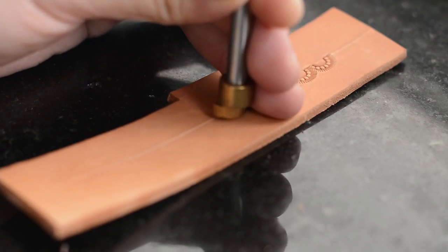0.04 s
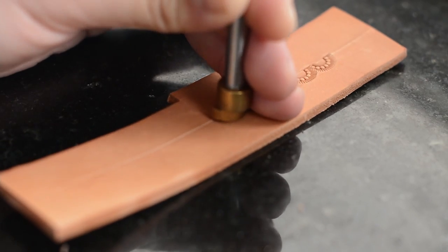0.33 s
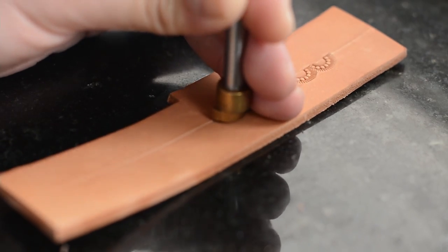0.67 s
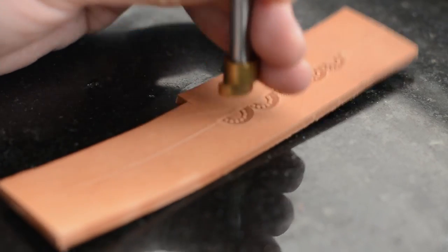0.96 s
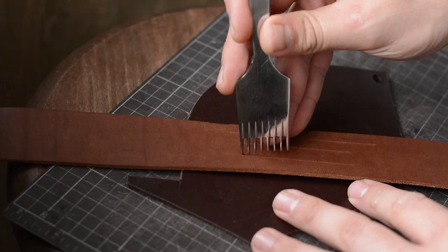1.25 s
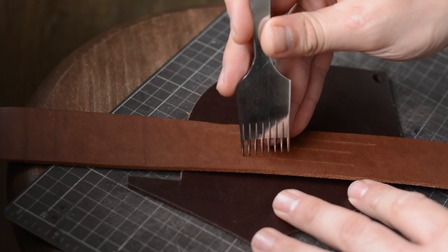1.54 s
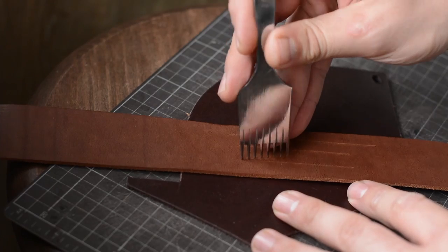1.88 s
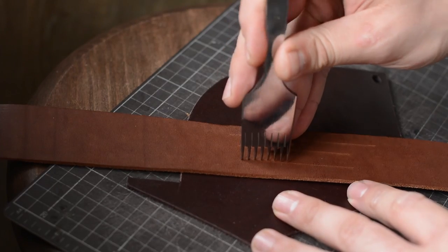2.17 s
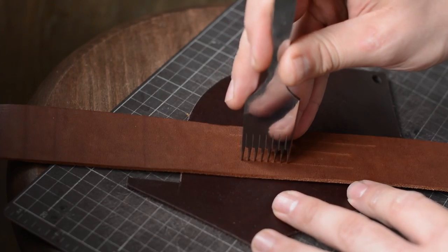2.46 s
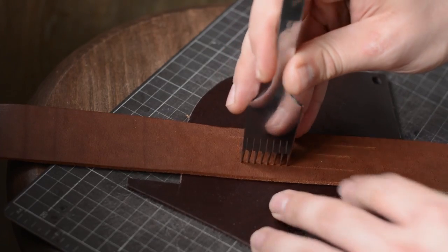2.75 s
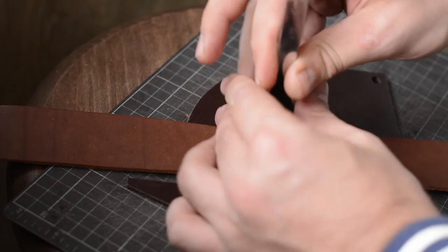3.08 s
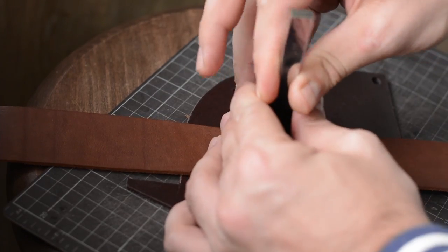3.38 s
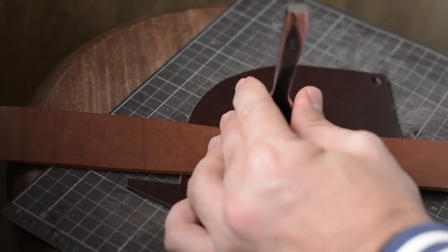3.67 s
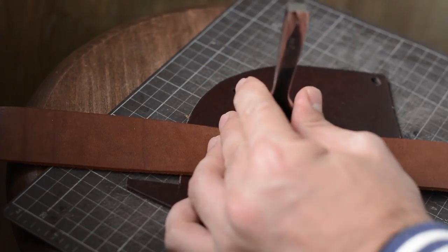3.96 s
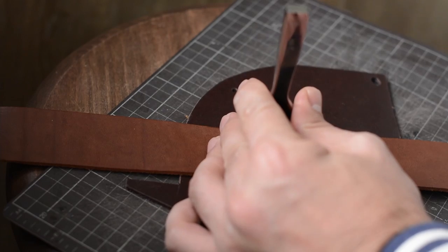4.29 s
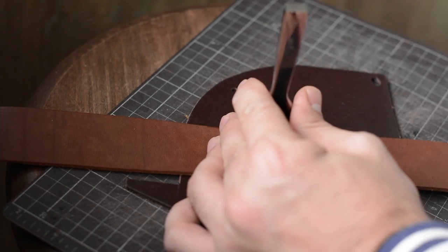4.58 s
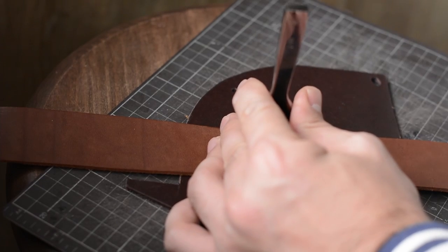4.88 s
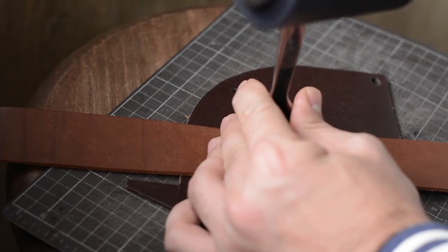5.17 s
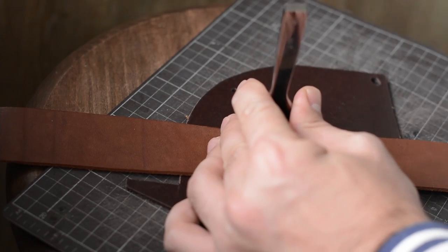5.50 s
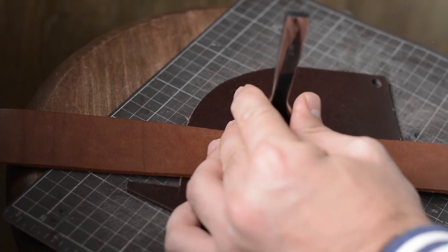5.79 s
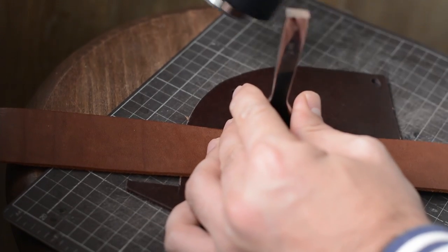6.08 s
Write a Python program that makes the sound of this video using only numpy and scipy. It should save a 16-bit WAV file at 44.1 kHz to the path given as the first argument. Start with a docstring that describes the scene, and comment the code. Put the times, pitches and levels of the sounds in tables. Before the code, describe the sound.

The microphone is close to a workbench in a small, quiet workshop with a faint steady hiss and hum. At about 0.7 seconds a mallet strikes a steel stamp on leather over a stone slab: a loud, sharp crack that briefly overloads, with a low thump from the bench. The steel rings faintly on, and a few tiny clicks sound as the stamp is eased out, until the ringing stops abruptly at 1.3 seconds. Only room tone follows. From about 3.5 to 5 seconds a hand and sleeve swish very softly, with a small bump near 4 seconds as the mallet is picked up. At 5.1 seconds a light tap sets a pricking iron. At 5.5 seconds a full blow lands on it, a loud, short metallic clank with a low bench shudder. A faint scuff follows near 5.9 seconds.

```python
"""Leatherwork in a small, quiet workshop

Close by, a mallet drives a stamp into a strap on a stone slab. The bench rocks; the steel rings on over a low
drone, and all of it breaks off abruptly. An arm rustles as it reaches for the mallet, and a pricking iron on a
wooden block gets a light setting tap and one full blow. The full blows overload the microphone."""
import sys
import numpy as np
from scipy import signal
from scipy.fft import rfft, irfft, next_fast_len
from scipy.io import wavfile

SR = 44100
rng = np.random.default_rng(int(sys.argv[2]) if len(sys.argv) > 2 else 0)


def generate_wav(signal):
    """Clip the signal to [-1, 1] and save it as 16-bit WAV at the path in sys.argv[1]."""
    frames = np.transpose(np.atleast_2d(signal))
    scaled = np.clip(frames, -1, 1) * 32767
    pcm = np.round(scaled).astype(np.int16)
    wavfile.write(sys.argv[1], SR, pcm)


N = 270774
TIME = np.arange(N) / SR

# Mallet on the stamp, lightly on the iron, fully on the iron. Each row: start in seconds, crack gain
# in dB, crack t60 in seconds, snap gain in dB, room gain in dB, left over right in dB.
STAMP_BLOW, SETTING_TAP, IRON_BLOW = [(0.7122, 4, .04, 9.5, -3, -0.36),
                                      (5.0684, -21.5, 0.022, -40, -30, -0.5),
                                      (5.5440, 2.5, 0.031, 4.5, -4.5, 3.5)]
# Stereo image of the reflections and of the room tone. Each row: frequency in Hz, L/R correlation.
ROOM_CORRELATION = [(50, .6), (130, .15), (300, .25), (600, 0.49), (1500, 0.55), (4000, 0.39), (10000, .1)]
AIR_CORRELATION = [(50, 0.97), (150, .45), (600, .22), (3000, .33), (14000, .42)]


def stamping(rebound_s=0.041, rebound_db=-16, linger_db=-42, linger_t60_s=2.1, drone_db=-56, stop_s=1.29):
    """One blow and a slight rebound; things on the bench hum on over a low drone. All ends at stop_s."""
    # Stamp, slab and, last, the damped mallet face. Each row: frequency in Hz, level in dB, t60 in seconds.
    modes = [(105, -25.5, .38), (124, -21.5, 0.66), (148, -33.5, 0.77), (192, -37, 1.2), (217, -10, 0.29),
             (253.4, -8, .18), (336, -10, .18), (400, -12.5, 0.12), (493, -11.5, 0.13), (553, -10, 0.16),
             (570, -48.5, 2.4), (736.5, -6, .17), (988.5, -14, .13), (1190, -47.5, 1.2), (1300, -19.5, .24),
             (2070, -17, .13), (2280, -38.5, 1.6), (2220, -46.5, 1.5), (3360, -19, .1), (3810, -18.5, 0.16),
             (12720, -41, .75), (556, 5.5, 0.019), (2495, 7, .012)]
    # Spectra of the blow, the bench's hum and the drone. Each row: frequency in Hz, relative density in dB.
    clatter = [(90, -7), (170, -6.5), (260, -2), (400, -5), (650, -1), (900, -4.5), (1300, -8), (1700, -11),
               (2400, -10.5), (4100, -10.5), (5200, -21), (9000, -28.5), (15500, -33.5)]
    linger = [(50, -18.5), (120, -2), (190, 1), (250, -13), (600, -14.5), (1300, -18), (2500, -25),
              (6000, -44)]
    drone = [(30, -3.5), (80, -10), (130, 2), (190, 4), (250, -15), (400, -9.5), (800, -19), (3000, -33.5)]
    start_s = STAMP_BLOW[0]
    out = mallet_blow(STAMP_BLOW, modes, clatter)
    add(out, start_s + rebound_s, from_db(rebound_db) * reverb(clatter))
    add(out, start_s, from_db(linger_db) * noise(linger, ROOM_CORRELATION) * decay(linger_t60_s))
    add(out, 0, from_db(drone_db) * noise(drone, AIR_CORRELATION, size=2 * SR))
    gate = np.clip((stop_s - TIME) / 0.0078, 0, 1)
    return out * gate


def pricking(tremble_db=-51):
    """A light tap sets the teeth; a full blow drives them through and leaves the block trembling."""
    # The iron before its teeth sink in; then iron, block and mallet face under the full blow.
    # Each row: frequency in Hz, level in dB, t60 in seconds.
    tap_modes = [(125, -35, 0.37), (404, -43.5, 0.25), (810, -30, 0.14), (1032, -18.5, 0.043),
                 (1178, -15, 0.056), (1475, -34, 0.11), (1880, -40, 0.059), (2910, -44, 0.057),
                 (4620, -41.5, 0.031)]
    iron_modes = [(104, -15, 0.16), (124.5, -17.5, 0.25), (302, -34.5, 0.5), (553, -15, 0.11),
                  (1130, -48, 0.94), (1176.4, -2, 0.088), (1296, -3, 0.17), (1362, -2, 0.089),
                  (1396, -3.5, 0.11), (1584, -5, 0.09), (2074, -24, 0.2), (2188, -16.5, 0.2),
                  (2282, -45, 1), (2346, -17, .14), (2410, -17, 0.13), (3120, -21, 0.15),
                  (3830, -19.5, 0.089), (1416, 5, 0.011), (2497, 11, 0.011)]
    # Noise spectra of the two strokes. Each row: frequency in Hz, relative density in dB.
    tap_clatter = [(60, -12), (110, -5), (200, -11.5), (310, -25.5), (400, -14), (620, -11.5), (850, -2),
                   (1150, -1), (1450, -10), (2300, -19.5), (3000, -32), (9000, -45)]
    iron_clatter = [(90, -11), (230, -15.5), (330, -17), (600, -16), (950, -16), (1270, 1.5), (1500, -2.5),
                    (1850, -13.5), (2400, -6.5), (3200, -16.5), (5000, -23.5), (9500, -38.5), (12700, -35),
                    (15500, -46)]
    out = mallet_blow(SETTING_TAP, tap_modes, tap_clatter)
    out += mallet_blow(IRON_BLOW, iron_modes, iron_clatter)
    add(out, IRON_BLOW[0], from_db(tremble_db) * swing(hz=40, rise_s=0.38, swell=1.5))
    return out


def mallet_blow(stroke, modes, clatter, contact_s=0.00011, snap_t60_s=0.0078):
    """The tool rings, the hard contact cracks with a bright first snap, and the room answers."""
    start_s, crack_db, crack_t60_s, snap_db, room_db, left_db = stroke
    crack = from_db(crack_db) * noise(clatter, correlation=[(100, 1), (10000, 0.43)]) * decay(crack_t60_s)
    bright = bandpass(rng.standard_normal(SR), edges_hz=[2000, 7000], order=1)
    snap = from_db(snap_db) * bright * decay(snap_t60_s)
    direct = (ringing(modes) + crack + snap) * attack(contact_s)
    out = np.zeros((2, N))
    add(out, start_s, direct * pan(left_db) + from_db(room_db) * reverb(clatter))
    return out


def ringing(modes, skew_rad=0.41):
    """Decaying modes of alternating polarity, leading left and right in turn."""
    out = 0
    for k, (hz, db, t60_s) in enumerate(modes):
        sign = (-1) ** k
        phase = 2 * np.pi * hz * TIME[:SR] + sign * skew_rad * np.array([[1], [-1]])
        out += sign * from_db(db) * decay(t60_s) * np.sin(phase)
    return out


def bench(sway_delay_s=0.061, sway_pitch_ratio=0.78):
    """Each jolt bounces the bench top; a slower sway on its legs follows."""
    # Each row: start in seconds, bounce in Hz, bounce level in dB, sway level in dB, sway rise in seconds.
    jolts = [(0.711, 46.5, -14.5, -11, 0.071), (4.069, 54.2, -57, -47.5, 0.065),
             (5.07, 52.7, -34, -39, 0.02), (5.545, 53.2, -21.5, -25.5, 0.047)]
    out = np.zeros((2, N))
    for start_s, hz, bounce_db, sway_db, sway_rise_s in jolts:
        bounce = swing(hz, rise_s=0.031, swell=2.4)
        sway = swing(hz * sway_pitch_ratio, sway_rise_s, swell=1.9)
        add(out, start_s, from_db(bounce_db) * bounce)
        add(out, start_s + sway_delay_s, from_db(sway_db) * sway)
    return out * pan(left_db=5)


def swing(hz, rise_s, swell):
    """A heavy body builds up its swing, then settles."""
    t = TIME[:SR]
    envelope = (t / rise_s * np.exp(1 - t / rise_s)) ** swell
    return -envelope * np.sin(2 * np.pi * hz * t)


def handling():
    """The stamp sounds the same two resonances at each touch; a bump is a dull thud and a bright scuff."""
    # Stamp eased out of the leather. Each row: start in seconds, knock in dB, click in dB.
    stamp_touches = [(0.854, -31, -56), (0.882, -41, -63), (0.948, -54, -39.5), (0.966, -34, -32.5),
                     (0.978, -51, -34.5), (1.149, -42, -51.5), (1.22, -43, -56.5)]
    # Mallet picked up, iron let go. Each row: start in seconds, thud in dB, thud centre in Hz,
    # thud t60 in seconds, scuff in dB, scuff t60 in seconds.
    bumps = [(4.045, -41, 420, 0.076, -38.5, 0.017), (4.154, -47.5, 235, 0.27, -72, .1),
             (5.926, -47.5, 1190, 0.063, -43.5, .12)]
    out = np.zeros((2, N))
    for start_s, knock_db, click_db in stamp_touches:
        knock = from_db(knock_db) * touch(hz=1330, half_width_oct=0.19, t60_s=0.041)
        click = from_db(click_db) * touch(hz=3700, half_width_oct=0.35, t60_s=0.017)
        add(out, start_s, knock + click)
    for start_s, thud_db, thud_hz, thud_t60_s, scuff_db, scuff_t60_s in bumps:
        thud = from_db(thud_db) * touch(hz=thud_hz, half_width_oct=0.45, t60_s=thud_t60_s)
        scuff = from_db(scuff_db) * touch(hz=3500, half_width_oct=1.4, t60_s=scuff_t60_s)
        add(out, start_s, thud + scuff)
    return out


def touch(hz, half_width_oct, t60_s, room_db=-21, room_t60_s=0.22, stereo_width=0.55):
    """A small contact: a noise burst in one broad resonance, with a faint room tail."""
    edges_hz = [hz / 2 ** half_width_oct, hz * 2 ** half_width_oct]
    mid, side = bandpass(rng.standard_normal((2, SR)), edges_hz, order=2)
    burst = mid + stereo_width * side * [[1], [-1]]
    burst /= np.sqrt(np.mean(burst ** 2))
    return burst * np.hypot(decay(t60_s), from_db(room_db) * decay(room_t60_s))


def arm(taper=1.18):
    """The bright swish and the dull sleeve rustle of the reaching arm follow the arm's speed."""
    # Reaching for the mallet and raising it.
    # Each row: fastest moment in seconds, nominal half-length in seconds, swish in dB, sleeve in dB.
    moves = [(3.561, .055, -61, -62), (3.898, 0.15, -54, -60.5), (4.082, 0.049, -54, -70),
             (4.421, .06, -52, -74), (4.78, 0.22, -69, -60)]
    # Spectra of the bright swish and the dull sleeve rustle. Each row: frequency in Hz, relative density in dB.
    swish_spectrum = [(150, -7), (400, -5.5), (650, -12.5), (1000, -3.5), (1700, -8.5), (2500, -5.5),
                      (5000, -11), (8000, -10), (15500, -16.5)]
    sleeve_spectrum = [(50, -12.5), (120, -0.5), (320, -3), (800, -7), (1500, -15.5), (5000, -30)]
    swish_gain, sleeve_gain = 0, 0
    for peak_s, half_s, swish_db, sleeve_db in moves:
        speed = 1 / np.cosh(np.clip(taper * (TIME - peak_s) / half_s, -20, 20))
        swish_gain = np.hypot(swish_gain, from_db(swish_db) * speed)
        sleeve_gain = np.hypot(sleeve_gain, from_db(sleeve_db) * speed)
    correlation = [(300, 0.6), (10000, 0.44)]
    swish = swish_gain * noise(swish_spectrum, correlation, size=N)
    sleeve = sleeve_gain * noise(sleeve_spectrum, correlation, size=N)
    return swish + sleeve


def reverb(clatter, build_s=0.01):
    """Reflections pile up, then each band dies at its own rate."""
    # Workshop decay. Each row: frequency in Hz, t60 in seconds.
    band_decays = [(100, 0.45), (300, .25), (1000, .205), (2500, 0.21), (5000, 0.17), (14000, 0.16)]
    centres_hz, t60s = np.transpose(band_decays)
    spectrum = rfft(noise(clatter, ROOM_CORRELATION))
    hz = np.maximum(np.fft.rfftfreq(SR, 1 / SR), 1)
    bands = [np.interp(np.log(hz), np.log(centres_hz), row) for row in np.eye(len(centres_hz))]
    tail = sum(irfft(spectrum * band, SR) * decay(t60_s) for band, t60_s in zip(bands, t60s))
    return tail * attack(build_s)


def room_tone(air_db=-56.29):
    """Steady room noise and microphone hiss with a faint hum."""
    # Room noise and hiss. Each row: frequency in Hz, relative density in dB.
    air_spectrum = [(12, -37.5), (20, -6.5), (32, -7), (64, 0.5), (115, -10), (190, -5), (225, -10.5),
                    (323, -9), (361, -12.5), (415, -11.5), (766, -14.5), (930, -15.5), (2270, -20),
                    (15500, -25)]
    # Each row: frequency in Hz, rms level in dB.
    hum_tones = [(59, -71.5), (188, -76)]
    hum = 0
    for hz, db in hum_tones:
        hum += from_db(db) * np.sqrt(2) * np.sin(2 * np.pi * (hz * TIME + rng.random()))
    air = from_db(air_db) * noise(air_spectrum, AIR_CORRELATION, size=N)
    return air * pan(left_db=2) + hum


def noise(spectrum, correlation, size=SR):
    """Stereo noise with a mid of rms 1; spectrum in dB and L/R correlation are given against Hz."""
    fft_size = next_fast_len(size, True)
    hz = np.maximum(np.fft.rfftfreq(fft_size, 1 / SR), 1)
    alike = at_hz(correlation, hz)
    width = np.sqrt((1 - alike) / (1 + alike))
    mid, side = rfft(rng.standard_normal((2, fft_size))) * from_db(at_hz(spectrum, hz))
    mid, side = irfft([mid, side * width], fft_size)[:, :size]
    return np.array([mid + side, mid - side]) / mid.std()


def at_hz(table, hz):
    """Interpolate on a log-frequency axis."""
    points_hz, values = np.transpose(table)
    return np.interp(np.log(hz), np.log(points_hz), values)


def bandpass(x, edges_hz, order):
    return signal.sosfilt(signal.butter(order, edges_hz, "band", fs=SR, output="sos"), x)


def attack(tau_s):
    return 1 - np.exp(-TIME[:SR] / tau_s)


def decay(t60_s):
    return np.exp(-np.minimum(np.log(1000) * TIME[:SR] / t60_s, 20))


def from_db(db):
    return 10 ** (np.asarray(db) / 20)


def pan(left_db):
    return from_db(np.array([[left_db], [-left_db]]) / 2)


def add(out, start_s, sound):
    start = round(start_s * SR)
    out[:, start:start + sound.shape[-1]] += sound[..., :N - start]


def scene():
    """The work lies slightly to the left: it reaches the right channel one sample later."""
    left, right = stamping() + pricking() + bench() + handling() + arm()
    return np.array([left, np.append(0, right[:-1])]) + room_tone()


def record(dry, threshold_db=-3, duck_db_per_db=0.16, release_db_per_s=9, smooth_s=0.06, cutoff_hz=15800):
    """Gain control ducks after loud peaks and creeps back; the result is clipped and low-passed."""
    peak_db = 20 * np.log10(np.abs(dry).max(axis=0) + 1e-9)
    duck_db = duck_db_per_db * np.maximum(peak_db - threshold_db, 0)
    release_db = release_db_per_s * TIME
    held_db = np.maximum.accumulate(duck_db + release_db) - release_db
    pole = np.exp(-1 / (smooth_s * SR))
    gain = from_db(-signal.lfilter([1 - pole], [1, -pole], held_db))
    lowpass = signal.ellip(10, 0.1, 70, cutoff_hz, fs=SR, output="sos")
    return signal.sosfilt(lowpass, np.clip(dry * gain, -1, 1))


dry = scene()
out = record(dry)
generate_wav(out)
```